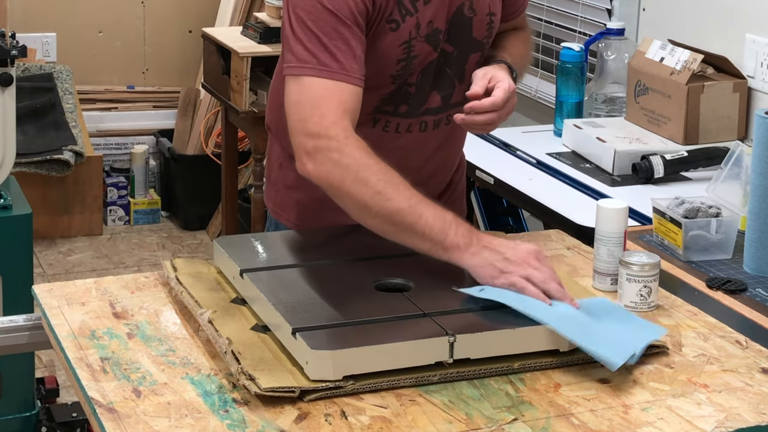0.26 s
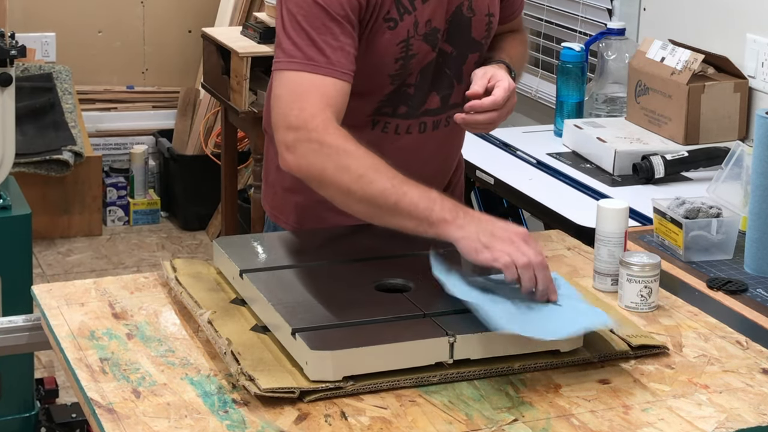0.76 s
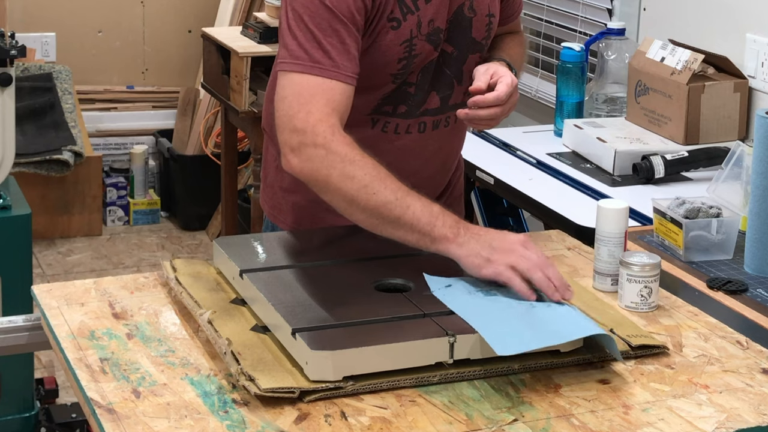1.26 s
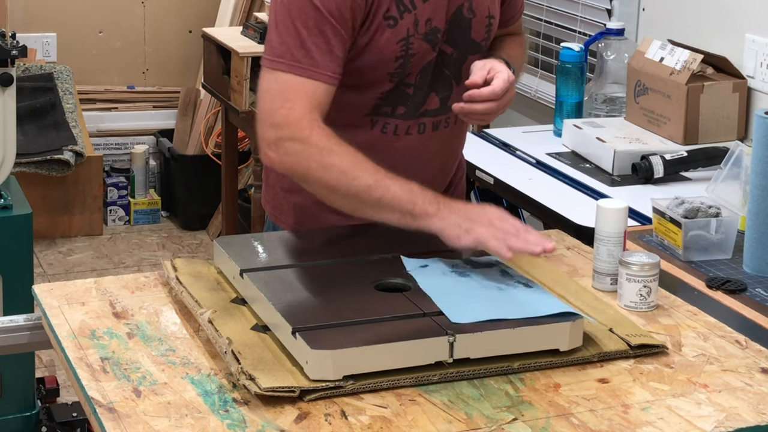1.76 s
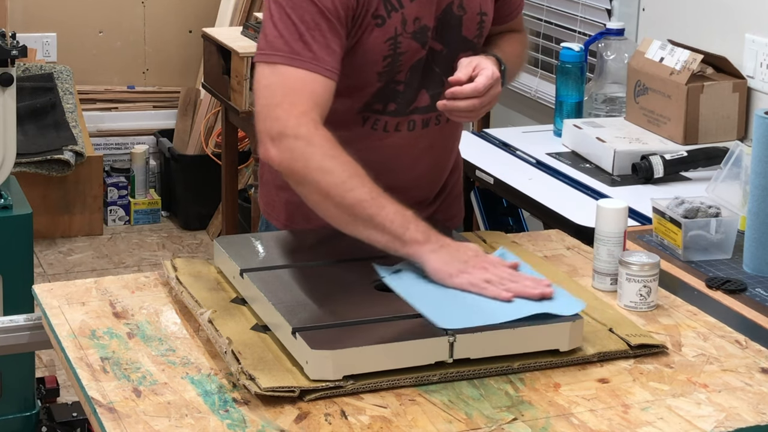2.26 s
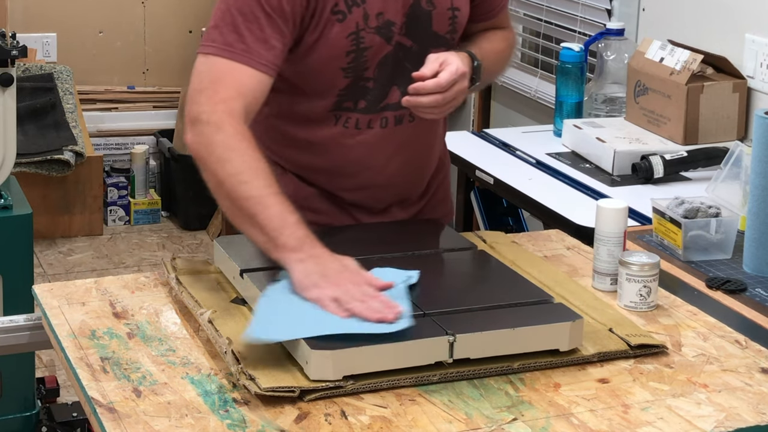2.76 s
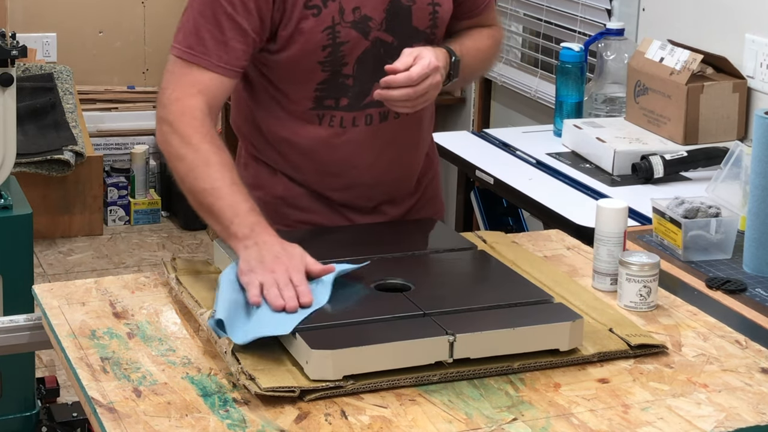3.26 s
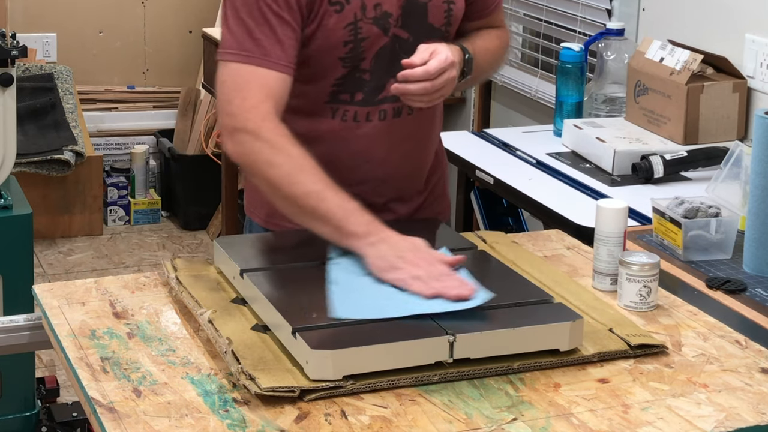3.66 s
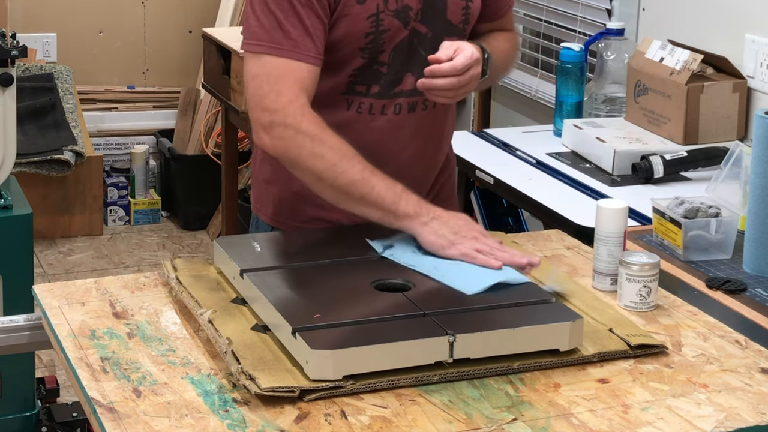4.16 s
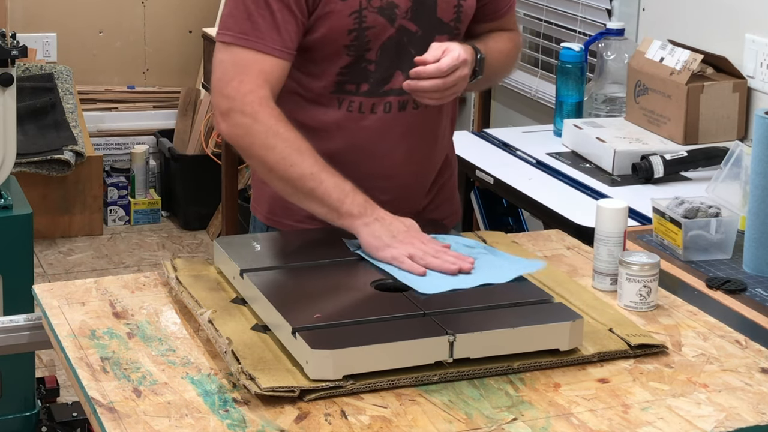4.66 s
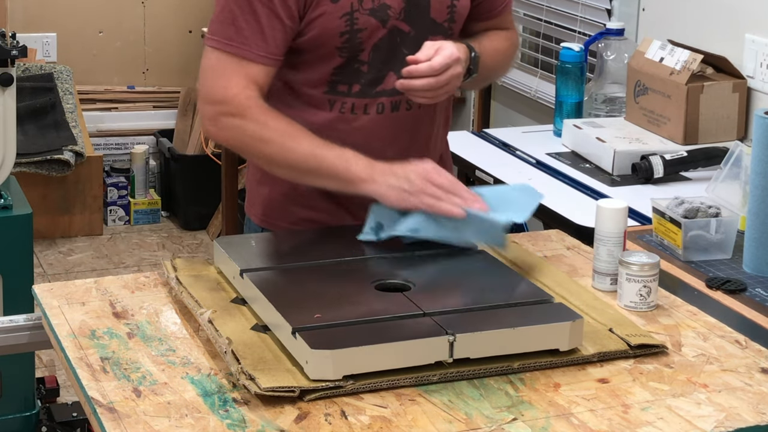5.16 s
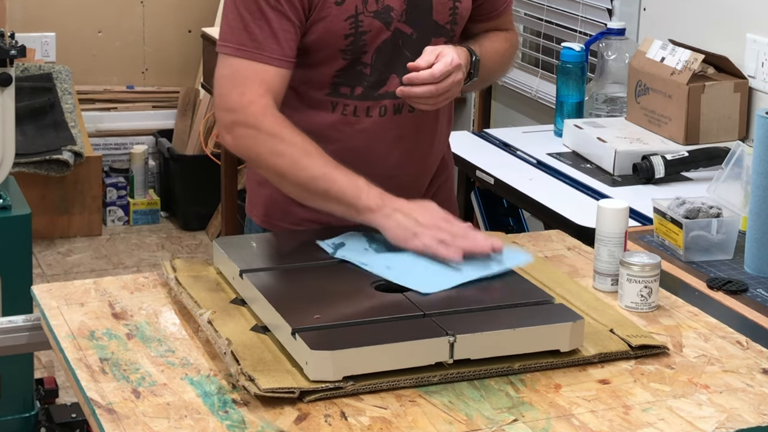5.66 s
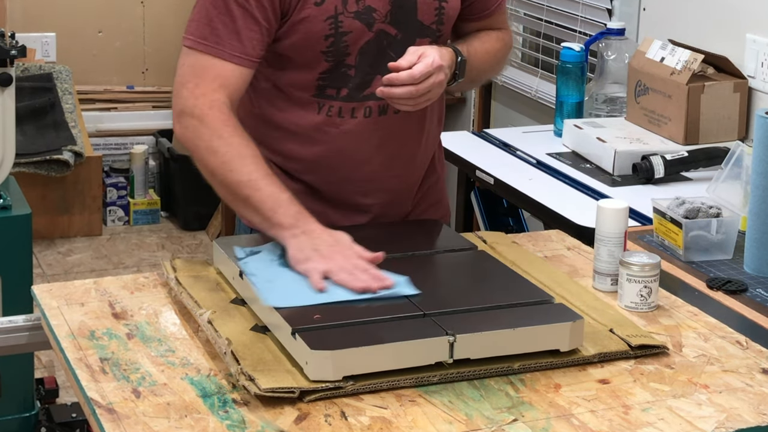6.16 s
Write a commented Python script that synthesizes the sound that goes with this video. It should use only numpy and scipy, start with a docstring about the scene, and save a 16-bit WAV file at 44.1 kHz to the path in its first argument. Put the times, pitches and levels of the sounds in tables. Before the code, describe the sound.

A paper towel rustles and taps on a metal table, then wipes it in long hissing strokes with scrapes and dull knocks in a small workshop.

```python
"""At a cast metal table resting on cardboard, in a small room, one microphone hears a paper towel wiped.
The sheet is laid out, pressed flat and wiped in long strokes. Shaped noise makes the fibres' hiss, the scrape,
the rustle and the judder of the table; each follows the hand's speed or brief swells.
Damped notes make the taps, noise bursts the snapping creases, low tones the palm's bumps.
Uneven low rumble, flutter, room tone and a faint whistle lie around it, with short echoes off the walls."""
import sys
import numpy as np
from scipy import signal
from scipy.fft import rfft, irfft, next_fast_len
from scipy.io import wavfile
from scipy.ndimage import map_coordinates

SR = 44100
rng = np.random.default_rng(int(sys.argv[2]) if len(sys.argv) > 2 else 0)


def file_out(sig):
    """Save sig as 16-bit WAV at sys.argv[1]."""
    # one column per channel
    cols = np.atleast_2d(sig).T
    # limit, then scale
    lim = np.clip(cols, -1, 1)
    pcm = np.round(lim * 32767).astype(np.int16)
    wavfile.write(sys.argv[1], SR, pcm)


N = 282092  # samples

# Uneven swells of very low rumble. Each row: loudest moment, rise and fall over 20 dB in seconds, level in dB.
RUMBLE_SWELLS = [(.16, .12, .3, -25), (.34, .3, .26, -25.5), (.8, .5, .24, -28), (1.6, .3, .35, -24),
                 (1.89, .13, .14, -25.5), (2.1, .16, .7, -26.5), (2.99, .4, .13, -26.5),
                 (3.31, .17, .3, -25), (3.62, .3, .14, -28), (4.1, .9, 1.5, -29), (4.6, .15, .5, -28),
                 (4.84, .4, .1, -20), (5.14, .12, .2, -24), (5.4, .22, .6, -25.5), (5.76, .14, .3, -21)]
# Colour of the low rumble. Each row: frequency in Hz, relative level in dB per Hz.
RUMBLE_COLOUR = [(1, -2), (4, 9), (12, 11.5), (20, 5), (30, -2.5), (45, -13.5), (90, -58), (300, -90)]
# Colour of the flutter at the microphone. Each row: frequency in Hz, relative level in dB per Hz.
FLUTTER_COLOUR = [(20, -5), (45, 1.5), (80, -1), (170, -12), (260, -17.5), (500, -82)]
# Colour of the steady room tone. Each row: frequency in Hz, relative level in dB per Hz.
ROOM_TONE = [(180, -30), (300, 0), (630, -2), (1300, -8), (3100, -12), (7000, -14.5), (10500, -17.5),
             (13500, -19), (16000, -21)]
RUMBLE_FLOOR_DB, FLUTTER_DB, ROOM_DB = -38, -55, -66
SHAKE_S = .2  # a shake of the microphone rises, then fades, 20 dB in this time

# Long wipes under the flat hand. Each row: start, fastest moment and end in seconds, hiss in dB,
# broad sheen in dB relative to the hiss, scrape, sheet rustle and table judder in dB.
WIPES = [(1.43, 1.59, 1.67, -52, -3, -51.5, -51, -52), (2.04, 2.78, 3.03, -45, -4, -44.5, -49, -55),
         (2.98, 3.15, 3.33, -52.5, -4, -50, -50, -51), (3.28, 3.56, 4.06, -46.5, -4, -53, -50, -54),
         (4.09, 4.22, 4.33, -60, -2.2, -53.5, -49, -50), (4.29, 4.42, 4.7, -46.5, -2.2, -52, -46.5, -54),
         (4.69, 4.85, 5.12, -51.5, -1.2, -48.5, -43.5, -56),
         (5.735, 6.25, 6.65, -43, -3.5, -51, -50.5, -57)]
# The loose sheet brushes the metal. Each row: loudest moment, rise and fall over 20 dB in seconds,
# hiss, scrape, rustle and judder in dB, region where the table shakes in Hz.
BRUSHES = [(0.0, .02, .2, -59, -55, -50, -48, 515), (.105, .2, .13, -59, -52, -50, -50, 620),
           (.203, .012, .1, -60, -53, -48, -56, 500), (.25, .1, .42, -54, -50.5, -45, -49, 350),
           (.33, .2, .12, -60, -51, -45, -46, 550), (.387, .05, .09, -55, -45, -38, -47, 600),
           (.515, .08, .09, -51, -44, -37, -42, 440), (.6, .05, .15, -75, -58, -54, -56, 600),
           (.71, .13, .11, -60, -55, -51, -53, 400), (.835, .04, .1, -61, -55, -50, -51, 400),
           (.96, .06, .1, -62, -58, -48, -52, 650), (.995, .05, .16, -57.5, -52, -53, -51, 660),
           (1.082, .04, .1, -64, -59, -53, -51, 660), (1.122, .02, .09, -57.5, -49, -47, -53, 660),
           (1.19, .1, .14, -61, -53, -51, -51, 660), (1.33, .03, .1, -70, -58, -52, -54, 500),
           (1.365, .04, .13, -50, -49, -47, -55, 610), (2.0, .1, .14, -55, -58, -54, -52, 510),
           (4.26, .08, .08, -60, -58, -50, -56, 390), (5.325, .015, .09, -63, -60, -53, -51, 630),
           (5.435, .14, .18, -68, -57, -53, -57, 600), (5.51, .05, .1, -72, -66, -62, -62, 400),
           (5.64, .015, .25, -70, -61, -52, -60, 690)]
# The wiping sheet catches on slots and edges. Each row: loudest moment, rise and fall over 20 dB in seconds,
# scrape, rustle and judder in dB, region where the table shakes in Hz.
CATCHES = [(2.205, .2, .14, -48, -44.5, -48, 575), (2.375, .06, .05, -60, -56, -48, 378),
           (2.47, .12, .5, -47, -54, -48, 520), (2.655, .15, .2, -47, -41, -40, 355),
           (2.73, .1, .1, -48, -41, -44, 410), (2.96, .15, .08, -44, -42, -49, 410),
           (3.33, .35, .35, -44.5, -45, -54, 530), (3.55, .2, .3, -60, -55, -51, 365),
           (3.668, .03, .17, -41, -33.5, -39, 450), (3.745, .1, .12, -46.5, -39, -37, 420),
           (3.98, .15, .3, -47, -43.5, -51, 640), (4.17, .03, .1, -55, -46, -50, 390),
           (4.425, .18, .1, -41, -40, -43, 400), (4.655, .03, .25, -52, -48, -46, 560),
           (4.81, .1, .2, -55, -45, -60, 500), (5.06, .12, .13, -47, -40, -54, 340),
           (5.15, .04, .13, -53, -48, -57, 400), (5.72, .04, .15, -58, -52, -50, 660),
           (5.77, .05, .15, -51, -46, -60, 500), (6.1, .15, .15, -56, -48, -46, 355),
           (6.23, .15, .07, -45, -46, -43, 540), (6.4, .05, .1, -49, -47, -52, 480)]
# Bright band of the hiss. Each row: time in seconds, centre in Hz.
BRIGHT = [(0, 9400), (.25, 10200), (.4, 8750), (1.0, 8400), (1.4, 9100), (1.66, 9800), (2.1, 10300),
          (2.37, 10500), (2.62, 9100), (2.94, 8800), (3.08, 8100), (3.33, 7800), (3.45, 8900), (3.7, 8800),
          (4.05, 9650), (4.35, 8900), (4.45, 9700), (4.61, 10600), (4.72, 8800), (4.86, 9500), (5.0, 7500),
          (5.33, 10000), (5.45, 8500), (5.97, 9800), (6.15, 9500), (6.4, 9300)]
# Colour of the broad sheen. Each row: frequency in Hz, relative level in dB per Hz.
SHEEN = [(3000, -4), (5500, -3), (9000, -10.5), (13000, -9.5), (16000, -14.5)]
# Colour of the drag. Each row: time in seconds, centre of the scrape in Hz, hollow under the palm in Hz.
DRAG_TONE = [(0, 2850, 1080), (.21, 2500, 1020), (.37, 2350, 1300), (.75, 2800, 1350), (1.0, 2500, 1050),
             (1.37, 2700, 1450), (1.46, 2600, 1200), (1.62, 2600, 1580), (2.19, 2600, 1300),
             (2.35, 3250, 1250), (2.72, 3150, 1120), (2.89, 2550, 1600), (3.1, 2550, 1450),
             (3.31, 2200, 1400), (3.7, 2350, 1350), (4.4, 2750, 1280), (4.81, 2400, 1350),
             (5.03, 2600, 1200), (5.15, 2350, 1470), (5.35, 2350, 1090), (5.7, 2250, 1020),
             (5.8, 2600, 1390), (6.2, 3000, 1250), (6.4, 2800, 1400)]
# Colour of the scrape ahead of its moving band. Each row: frequency in Hz, relative level in dB per Hz.
SCRAPE = [(1200, -23), (1900, 3), (2500, -1.5), (3500, -1), (5000, -4), (7000, -12.5), (9000, -25),
          (13000, -38)]
# Resonances of the pressed sheet. Each row: frequency in Hz, width in Hz, relative level in dB.
SHEET_MODES = [(978, 337, 3.5), (1286, 172, -2.5), (1676, 660, 1.5)]
# Resonances of the table on its cardboard. Each row: frequency in Hz, width in Hz, relative level in dB.
TABLE_MODES = [(236, 60, -5), (323, 132, 4), (430.7, 81, -4), (596, 58, -8), (662, 360, 1)]
HISS_GROWS, DRAG_GROWS = .5, 1.05  # amplitude goes as hand speed to this power
BRUSH_SHEEN_DB = -3  # broad sheen relative to the hiss of a brush
LET_GO_S = .02  # time constant with which the power of the hiss follows the hand
DRAG_LEADS_S, DRAG_TRAILS_S = .04, .07  # the drag begins before each wipe's hiss and outlasts the stroke
WIPE_REGION_HZ = 480  # where the table shakes most under a plain wipe

# Taps and buckles of the sheet on the table.
# Each row: start in seconds, relative level in dB, pitch in Hz, time to fall 60 dB in seconds.
TAPS = [(.0992, -32.5, 750, 0.056), (0.2182, -24.5, 327, 0.023), (.2762, -27.5, 486, 0.023),
        (0.3912, -24, 750, 0.013), (0.498, -35, 1390, 0.055), (0.8163, -34.5, 383, 0.045),
        (0.934, -37, 425, 0.16), (.969, -37, 693, 0.086), (1.079, -38, 696, 0.058),
        (1.2055, -32, 660, 0.043), (1.322, -44, 409, 0.039), (1.995, -47, 616, 0.041),
        (2.381, -42, 326, 0.12), (2.691, -22.5, 1110, 0.023), (2.742, -26, 350, 0.077),
        (2.752, -26, 573, .04), (2.939, -32, 1360, .05), (3.381, -27.5, 375, 0.025),
        (3.5055, -30.5, 390, 0.045), (3.6604, -17.5, 477, 0.031), (3.700, -30, 433, 0.056),
        (3.755, -24, 1270, 0.034), (4.164, -25, 356, 0.049), (4.349, -26.5, 1270, 0.029),
        (4.4012, -23, 405, 0.02), (5.25, -46, 361, 0.039), (5.323, -43, 900, 0.047), (5.505, -42, 403, .04),
        (5.7032, -21, 775, 0.011), (6.103, -38, 324, 0.12), (6.188, -25, 560, 0.032),
        (6.213, -30.5, 353, 0.12), (6.2468, -21, 586, 0.022)]
# A faint thin whistle. Each row: time in seconds, pitch in Hz, level in dB, both before their wobble.
WHISTLE = [(.12, 13800, -90), (.15, 13900, -72), (.18, 13980, -72), (.21, 13880, -74), (.24, 13800, -100),
           (.76, 13500, -100), (.82, 13600, -74), (.95, 13700, -76), (1.1, 13450, -78), (1.18, 13400, -100)]
# Creases snapping. Each row: start in seconds, relative level in dB, time to fall 60 dB in seconds.
SNAPS = [(.197, -43, 0.032), (.8144, -49, 0.027), (0.9254, -37, 0.0067), (.985, -41, .04),
         (1.12, -37.5, .05), (1.324, -50, 0.027), (1.346, -40, .03), (1.99, -42.5, .03),
         (2.081, -43.5, .02), (4.648, -40, .03), (5.3184, -52, .05), (5.632, -52.5, .05),
         (5.7378, -46, .03)]
# Colour of a snap. Each row: frequency in Hz, relative level in dB per Hz.
CREASE = [(500, -30), (1200, 0), (3000, -3), (9000, -7), (16000, -20)]
# The palm bumps the table.
# Each row: time in seconds, starting level in dB, pitch in Hz, shaking of the microphone in dB.
BUMPS = [(2.706, -42, 110, -49), (2.9744, -31.5, 122, -52), (4.768, -35, 70, -43), (5.094, -34, 90, -50),
         (5.819, -26, 40, -60)]
# Echo off the walls. Each row: frequency in Hz, time to fall 60 dB in seconds.
WALLS = [(200, 0.22), (2000, 0.24), (10000, 0.11)]
TAP_TRIM_DB, SNAP_TRIM_DB, ECHO_DB = -2, -6, -13
TOP_HZ = 15760  # upper limit of the microphone's band


def amp(db):
    """Gain of a level in dB; twice the dB gives power."""
    return 10 ** (np.asarray(db) / 20)


def unit(x):
    """x at rms 1."""
    return x / np.sqrt(np.mean(x ** 2) + 1e-20)


def along(points, hz):
    """Values between (Hz, value) points on a log frequency axis."""
    f, v = np.transpose(points)
    return np.interp(np.log(hz + 1), np.log(f + 1), v)


def curves(rows):
    """One value per sample for each column after the time."""
    s, *cols = np.transpose(rows)
    return [np.interp(np.arange(N) / SR, s, c) for c in cols]


def wobble(rate):
    """A smooth random curve with rate knots a second."""
    knots = rng.standard_normal(int(N * rate / SR) + 4)
    return map_coordinates(knots, [np.arange(N) * rate / SR])


def filtered(x, response):
    """x filtered by a response given as a function of frequency in Hz."""
    m = next_fast_len(N + SR // 2)
    return irfft(rfft(x, m) * response(np.fft.rfftfreq(m, 1 / SR)), m)[..., :N]


def coloured(x, spectrum):
    """x through a (Hz, dB) spectrum, at rms 1."""
    return unit(filtered(x, lambda hz: amp(along(spectrum, hz))))


def resonant(x, modes):
    """x through a body's resonances, their powers adding."""
    def response(f):
        peaks = [amp(2 * db) / (1 + (2 * (f - centre) / width) ** 2) ** 2 for centre, width, db in modes]
        return np.sqrt(sum(peaks))
    return filtered(x, response)


def friction(grain_db, catch_rate):
    """Countless small slips: noise whose strength wavers as fibres catch and let go."""
    return amp(grain_db * wobble(catch_rate)) * rng.standard_normal(N)


def moving_band(x, centre_hz, spread, skirt_db):
    """x with a bump that follows centre_hz (spread in log frequency) over a flat skirt, at rms 1."""
    hz, t, z = signal.stft(x, SR, nperseg=1024, noverlap=896)
    centre = centre_hz[np.minimum((t * SR).astype(int), N - 1)]
    distance = np.log((hz[:, None] + 1) / centre) / spread
    band = np.exp(-.5 * distance ** 2) + amp(skirt_db)
    # the level stays steady wherever the bump goes
    mean_power = np.mean(abs(z) ** 2, axis=1, keepdims=True)
    band /= np.sqrt(np.mean(band ** 2 * mean_power, axis=0))
    return unit(signal.istft(z * band, SR, nperseg=1024, noverlap=896)[1][:N])


def hand_speed(lead_s=0, trail_s=0):
    """Hand speed 0-1 in each wipe: a quarter sine up to the fastest moment, another down."""
    t = np.arange(N) / SR
    phases = [np.interp(t, [start - lead_s, fastest, end + trail_s], [0, 1, 0])
              for start, fastest, end, *_ in WIPES]
    return np.sin(np.pi / 2 * np.array(phases))


def bursts(rows):
    """Power shape of each short event: a steady climb and a steady fade in dB, in steps of 32 samples."""
    s, rise, fall = np.transpose(rows)[:3, :, None]
    late = np.arange(0, N, 32) / SR - s
    shape = amp(-40 * np.where(late < 0, -late / rise, late / fall))
    return np.repeat(shape, 32, axis=1)[:, :N]


def background():
    """Uneven low rumble and flutter at the microphone over room tone; bumps on the table shake it a little."""
    rumble_power = amp(2 * RUMBLE_FLOOR_DB) + amp(2 * np.transpose(RUMBLE_SWELLS)[3]) @ bursts(RUMBLE_SWELLS)
    rumble = np.sqrt(rumble_power) * coloured(rng.standard_normal(N), RUMBLE_COLOUR)
    shakes = bursts([(row[0], SHAKE_S, SHAKE_S) for row in BUMPS])
    shaken = amp(2 * np.transpose(BUMPS)[3]) @ shakes
    # slips stand in for nothing here: plain noise of wavering strength
    unsteady = coloured(amp(1.5 * wobble(60)) * rng.standard_normal(N), FLUTTER_COLOUR)
    flutter = np.sqrt(amp(2 * FLUTTER_DB) + shaken) * unsteady
    room_tone = amp(ROOM_DB) * coloured(rng.standard_normal(N), ROOM_TONE)
    return rumble + flutter + room_tone


def hiss():
    """Fibres rubbing on metal: a moving bright band of noise rides over a broad sheen."""
    centre_hz, = curves(BRIGHT)
    bright = moving_band(friction(grain_db=1.0, catch_rate=170), centre_hz, spread=0.23, skirt_db=-37)
    sheen = coloured(friction(grain_db=1.0, catch_rate=510), SHEEN)
    lag = np.exp(-1 / (LET_GO_S * SR))
    wiping = signal.lfilter([1 - lag], [1, -lag], hand_speed() ** (2 * HISS_GROWS))
    hiss_db, sheen_db = np.transpose(WIPES)[3:5]
    brushed = amp(2 * np.transpose(BRUSHES)[3]) @ bursts(BRUSHES)
    # the sheen takes its share of the power, the bright band the rest
    total = amp(2 * hiss_db) @ wiping + brushed
    broad = amp(2 * (hiss_db + sheen_db)) @ wiping + amp(2 * BRUSH_SHEEN_DB) * brushed
    return np.sqrt(broad) * sheen + np.sqrt(abs(total - broad)) * bright


def drag():
    """The same rubbing scrapes, rustles the sheet and shakes the table, which judders in coarser jerks."""
    scrape_hz, hollow_hz = curves(DRAG_TONE)
    wiping = hand_speed(DRAG_LEADS_S, DRAG_TRAILS_S) ** (2 * DRAG_GROWS)
    shapes = np.vstack([wiping, bursts(BRUSHES), bursts(CATCHES)])
    # scrape, rustle and judder of every event
    levels_db = np.array([r[5:] for r in WIPES] + [r[4:7] for r in BRUSHES] + [r[3:6] for r in CATCHES])
    regions_hz = np.array([WIPE_REGION_HZ] * len(WIPES) + [r[-1] for r in BRUSHES + CATCHES])
    tiny = 1e-30  # keeps the division safe in silence
    power = amp(2 * levels_db.T) @ shapes + tiny
    # the judder sits at the power-weighted mean of the regions sounding
    judder_power = amp(2 * levels_db[:, 2])
    region_hz = (judder_power * regions_hz @ shapes + tiny * WIPE_REGION_HZ) / power[2]

    scraping = coloured(friction(grain_db=1.0, catch_rate=150), SCRAPE)
    scrape = moving_band(scraping, scrape_hz, spread=0.25, skirt_db=0)
    rustling = resonant(friction(grain_db=1.5, catch_rate=120), SHEET_MODES)
    rustle = moving_band(rustling, hollow_hz, spread=.13, skirt_db=-5)
    shaking = resonant(friction(grain_db=3.5, catch_rate=90), TABLE_MODES)
    judder = moving_band(shaking, region_hz, spread=0.42, skirt_db=-4)
    return np.sum(np.sqrt(power) * [scrape, rustle, judder], axis=0)


def placed(events):
    """A track with each (start in seconds, sound) added in its place."""
    out = np.zeros(N + SR)
    for s, sound in events:
        out[round(s * SR):][:len(sound)] += sound
    return out[:N]


def taps():
    """Each tap is a short damped note with a weaker, faster-dying overtone at a random ratio."""
    t, events = np.arange(SR // 4) / SR, []
    for s, db, hz, t60 in TAPS:
        overtone = .4 * np.sin(2 * np.pi * hz * rng.uniform(1.3, 1.8) * t) * amp(-40 * t / t60)
        note = np.sin(2 * np.pi * hz * t) + overtone
        onset = 1 - np.exp(-t / 0.00045)
        events.append((s, amp(db + TAP_TRIM_DB - 60 * t / t60) * onset * note))
    return placed(events)


def whistle():
    """A thin high tone, slightly unsteady in pitch and level."""
    hz, db = curves(WHISTLE)
    phase = 2 * np.pi * np.cumsum(hz + 70 * wobble(150)) / SR
    return amp(db + 2.5 * wobble(60)) * np.sin(phase)


def snaps():
    """Each snapping crease is a decaying burst of dry noise."""
    t, events = np.arange(SR // 4) / SR, []
    dry_noise = coloured(rng.standard_normal(N), CREASE)
    for s, db, t60 in SNAPS:
        noise = dry_noise[round(s * SR):][:len(t)]
        events.append((s, amp(db + SNAP_TRIM_DB - 60 * t / t60) * noise))
    return placed(events)


def bumps():
    """Each bump of the palm is one low push, falling 60 dB in four cycles."""
    t = np.arange(SR // 4) / SR
    return placed([(s, amp(db - 60 * t * hz / 4) * np.sin(2 * np.pi * hz * t)) for s, db, hz, _ in BUMPS])


def wall_echoes(x, count=22):
    """Noise tails that die at their own speed in each frequency; every stretch of x gets a fresh tail."""
    out, step = np.zeros(N + 2 * SR), -(-N // count)
    for k in range(count):
        hz, t, z = signal.stft(rng.standard_normal(SR // 2), SR, nperseg=256)
        decay = amp(-60 * t / along(WALLS, hz)[:, None])
        tail = signal.istft(z * decay, SR, nperseg=256)[1]
        wet = signal.fftconvolve(x[k * step:][:step], tail / np.linalg.norm(tail))
        out[k * step + 300:][:len(wet)] += wet  # the walls answer 300 samples late
    return out[:N]


def scene():
    """Towel and table close to the microphone, their echoes, the whistle and the background."""
    towel = hiss() + drag() + taps() + snaps() + bumps()
    return (towel + amp(ECHO_DB) * wall_echoes(towel) + whistle() + background())[None]


def record(dry):
    """The microphone keeps nothing above its band limit."""
    return filtered(dry, lambda hz: hz < TOP_HZ)


dry = scene()
out = record(dry)
file_out(out)
```